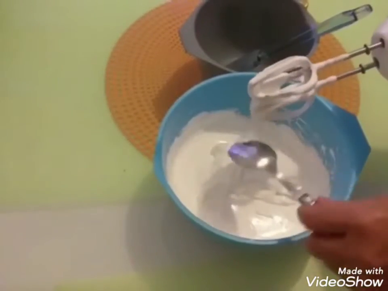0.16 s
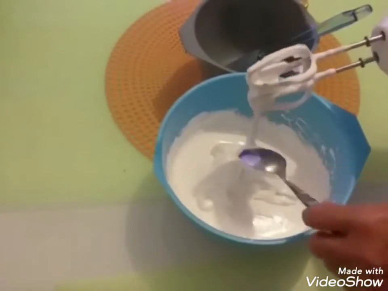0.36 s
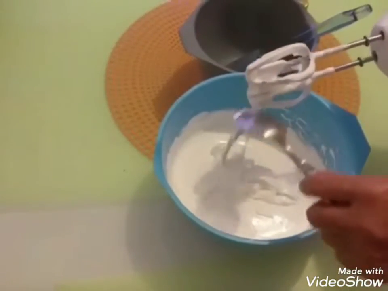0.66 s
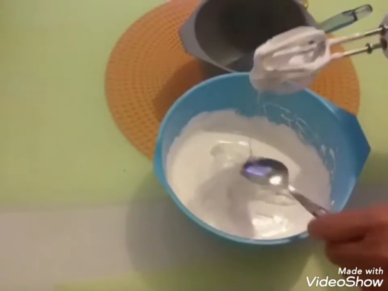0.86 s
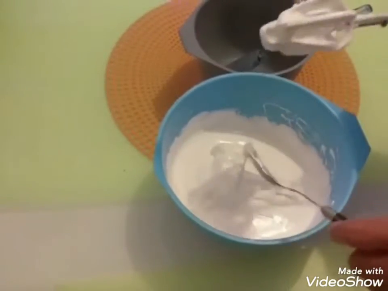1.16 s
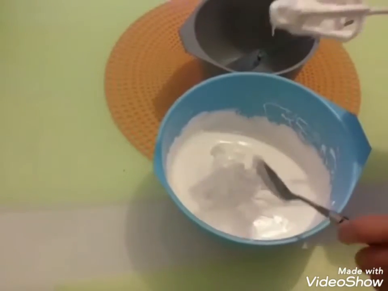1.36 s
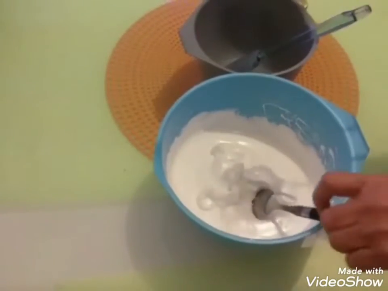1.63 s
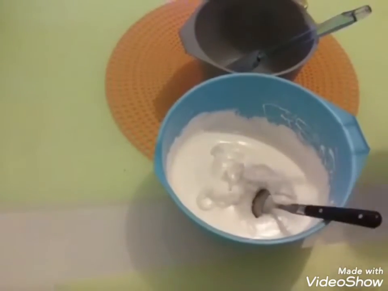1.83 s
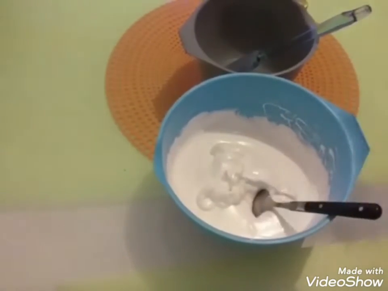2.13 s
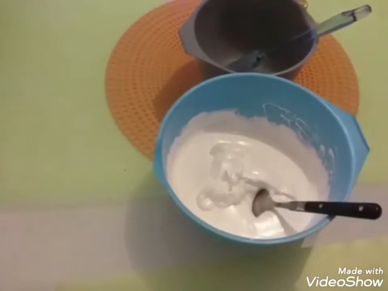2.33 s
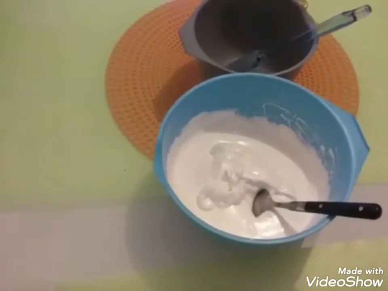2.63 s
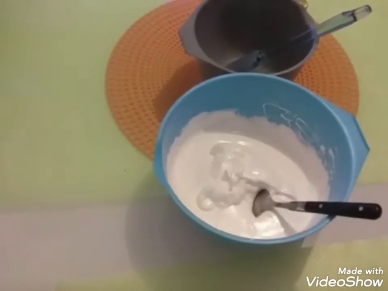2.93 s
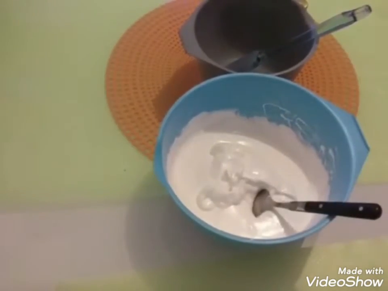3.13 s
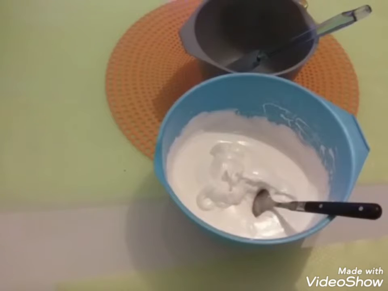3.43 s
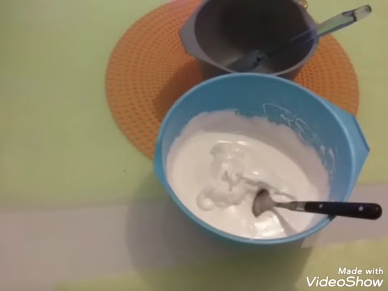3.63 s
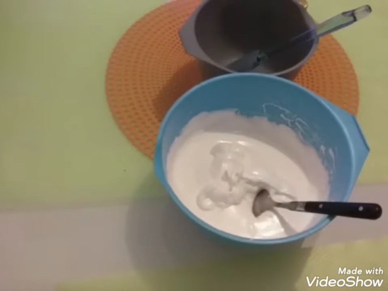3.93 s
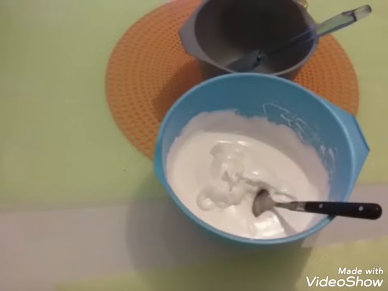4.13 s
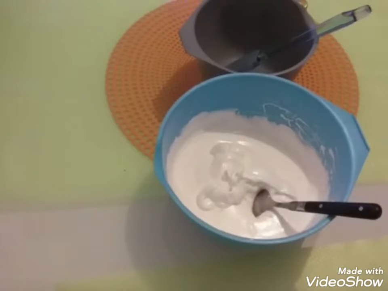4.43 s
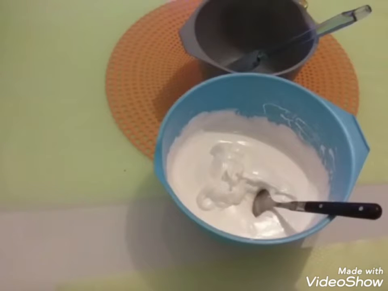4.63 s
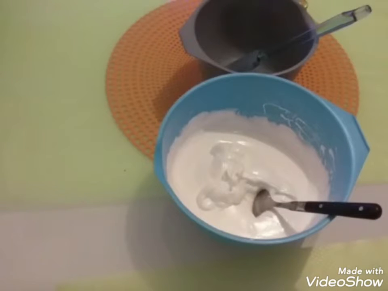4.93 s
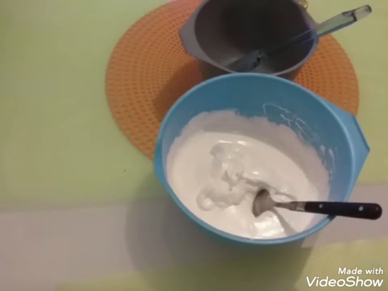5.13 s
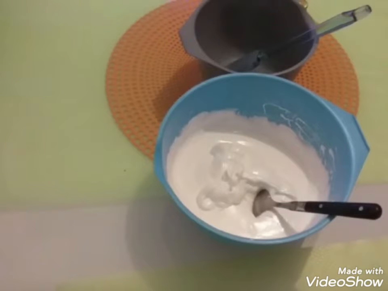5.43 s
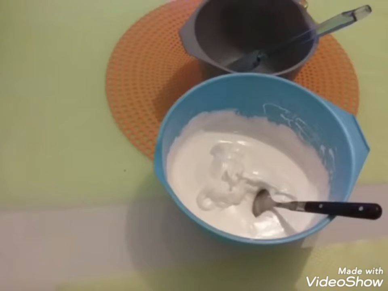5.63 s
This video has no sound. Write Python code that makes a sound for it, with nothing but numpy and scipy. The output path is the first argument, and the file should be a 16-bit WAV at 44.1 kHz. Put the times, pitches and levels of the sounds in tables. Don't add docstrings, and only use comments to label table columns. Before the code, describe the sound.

A metal spoon raps creamy mixer beaters and drops on a plastic bowl, then kitchen clatter, a ringing pan and a drawer slamming loudly.

```python
import sys
import numpy as np
from scipy import signal
from scipy.fft import rfft, irfft, next_fast_len
from scipy.io import wavfile
from scipy.ndimage import uniform_filter1d

SR = 44100
rng = np.random.default_rng(int(sys.argv[2]) if len(sys.argv) > 2 else 0)


def waveform_to_disk(signal):
    frames = np.transpose(np.atleast_2d(signal))
    scaled = np.clip(frames, -1, 1) * 32767
    samples = np.round(scaled).astype(np.int16)
    wavfile.write(sys.argv[1], SR, samples)


def gain_from_decibels(decibels):
    exponent = np.asarray(decibels, float) / 20
    return 10 ** exponent


N = 254501
PAD = next_fast_len(N)
LEAD = 256

# lower edge f/Hz, upper edge f/Hz
BANDS_HZ = [(90, 700), (700, 2500), (2500, 8300), (8300, 16400)]
WIDTHS_HZ = np.diff(BANDS_HZ)[:, 0]

# f/Hz, width/Hz, level/dB
STAND = [(1247, 50, -8), (2173, 36, -3), (2670, 110, -12), (3156, 74, -1.5), (4010, 39, 1.5),
         (4540, 18, -9), (4600, 30, -3), (5040, 62, 3), (5500, 31, -12), (6200, 79, -2), (6500, 25, -7),
         (6970, 37, -12), (7800, 27, -15), (7800, 46, -14)]
PAN = [(1162, 32, -3), (2130, 39, 1.5), (3210, 58, -3), (3260, 18, -6.5), (3630, 26, -0.5), (4060, 19, 2),
       (4230, 27, 0.5), (4400, 28, 0.5), (4980, 27, 1.5), (5300, 24, -8), (5500, 34, -5.5),
       (6450, 34, -1.5), (7160, 43, -4), (7900, 26, 0)]
LID = [(1386, 51, -4.5), (2030, 20, -20), (2660, 180, -5.5), (3800, 110, -5.5), (4700, 36, 1)]
# f/Hz, width/Hz, level/dB
BOWL = [(143, 40, -17.5), (285, 100, -0.5), (464, 48, 2), (780, 30, 1), (1020, 15, 4.5), (1196, 50, 14.5),
        (1440, 76, 10), (1940, 31, 13.5)]
HANDLE = [(269, 30, -5.5), (507, 30, 3), (1560, 60, -3)]
RUNNER = [(235, 40, -14), (394, 40, 1.5), (493, 40, 2.5), (675, 40, -6), (731, 40, -5.5)]
FRONT = [(129, 33, -18), (506, 190, -6.5), (759, 39, 1.5), (1044, 27, -4.5), (1265, 15, -4),
         (1414, 35, 5.5), (1570, 41, 1), (2086, 83, 13.5), (2200, 18, -14), (2583, 120, 12.5),
         (2950, 38, -13), (3250, 53, -23), (3910, 180, -11)]
CARCASS = [(117, 22, -13.5), (339, 33, -5), (780, 34, -3.5), (1102, 94, 4.5), (1446, 170, 7), (1930, 51, 3),
           (2160, 41, 2), (3820, 32, -13), (3920, 190, 9), (4530, 170, 3)]
# f/Hz, width/Hz, level/dB
WIRE_TIP = [(650, 290, -11), (1750, 130, -8), (3340, 100, 1.5), (4550, 110, -7), (5300, 120, -1.5),
            (6600, 100, -9), (8400, 110, -23.5), (10100, 140, -21), (13300, 120, -8.5), (13700, 130, -11)]
WIRE_SCRAPED = [(614, 29, -6), (3700, 50, 4.5), (4750, 73, 8), (5950, 98, -10), (6900, 44, -8),
                (7300, 78, -3.5), (7840, 66, -2.5), (8120, 30, -8), (9820, 180, -14), (13300, 170, -13.5)]
WIRE_BEND = [(596, 97, -5), (1870, 82, 5), (3110, 290, 3.5), (4800, 160, -15), (5550, 110, -7.5),
             (6600, 80, -12), (7220, 160, 1), (9620, 75, -17), (10800, 110, -26.5), (13100, 130, -15.5)]
WIRE_SIDE = [(1140, 22, 1), (2940, 110, -2), (3600, 38, -9.5), (3870, 23, -2.5), (4620, 15, -7.5),
             (5700, 46, -6), (6840, 52, -0.5), (7900, 30, -7.5), (9420, 78, 0), (13100, 63, -6)]
WIRE_ROOT = [(480, 35, -9), (1330, 28, 3), (2320, 46, -8.5), (3260, 21, -2), (4620, 58, -4.5),
             (5890, 40, -5), (7500, 35, 4), (11700, 100, -17), (13200, 130, -16.5), (13900, 44, -15.5)]
# f/Hz, level/dB, t60/s
MIXER_SHELL = [(420, -8.5, 0.33), (520, -3.5, 0.13), (2290, 5.5, .08), (7900, 14.5, 0.013),
               (7860, 19.5, .02)]
FLOOR_BOARD = [(175, 0, .25), (228, -2, .25)]
PAN_WALL = [(737, -10, 0.52), (1163, -9, 0.27), (1410, -3, 0.47), (1800, -12, .4), (1910, -7, .38),
            (2090, -10, 0.22)]
DRAWER_PANEL = [(117.8, -13, 0.32), (355, -5, 0.28), (493, -6, 0.25), (778, 4.5, .22), (1083, 0.5, 0.51),
                (1250, -9, 0.32), (1390, -14, 0.34), (1600, -6, .2), (1701, -9, .35), (1880, -3, 0.23),
                (2022, -10, 0.45), (2143, -15, 0.26), (2500, 2, .13)]
DRAWER_BOX = [(118, -4, .4), (345, 0, .4), (417, -6, .3), (735, -6, .3), (1080, -6, .3)]


def unit(x):
    return x / np.sqrt(np.mean(x ** 2))


def band(x, lo_hz, hi_hz):
    return signal.sosfilt(signal.butter(3, [lo_hz, hi_hz], "band", fs=SR, output="sos"), x)


def grains(count, spike_db):
    return unit(rng.standard_normal(count) * gain_from_decibels(spike_db * np.minimum(rng.exponential(size=count), 4)))


def band_noises(count, spike_db=0.):
    noise = grains(count, spike_db)
    return np.array([unit(band(noise, *edge)) for edge in BANDS_HZ])


def add(out, x, s):
    i = max(int(s * SR), 0)
    out[i:i + len(x)] += x[:len(out) - i]


def curve(rows):
    return np.interp(np.arange(N) / SR, *np.transpose(rows))


def walk(rate):
    k = int(SR / rate)
    held = np.repeat(rng.standard_normal(N // k + 1), k)
    return unit(uniform_filter1d(held, k)[:N])


def damped(peaks, cycles):
    return [(hz, db, cycles / hz) for hz, width, db in peaks]


def ring(modes, longest_s, scatter_db, rise_s):
    hz, db, t60 = np.transpose(modes)[:, :, None]
    chance = rng.standard_normal((2, len(modes), 1))
    t60 = np.minimum(t60, longest_s)
    t = np.arange(int(SR * t60.max())) / SR
    level_db = db + scatter_db * chance[0] - 60 * t / t60
    lines = gain_from_decibels(level_db) * np.sin(2 * np.pi * hz * t + chance[1])
    return lines.sum(axis=0) * (1 - np.exp(-t / rise_s))


def burst(envelope, band_db, spike_db):
    # f/Hz, the first an anchor below the bands
    centres_hz = [110, 370, 1400, 4500, 11500]
    envelope = np.roll(envelope, LEAD)
    x = grains(len(envelope), spike_db) * envelope
    spectrum = rfft(x)
    even = irfft(spectrum / (np.abs(spectrum) + 1e-12) ** .75, len(x))
    x = even * (envelope / envelope.max()) ** .3
    density = np.array(band_db) - 10 * np.log10(2 * WIDTHS_HZ / SR)
    grid = np.log(np.fft.rfftfreq(len(x), 1 / SR) + 1)
    shape = np.interp(grid, np.log(centres_hz), [density[0] - 30, *density])
    return irfft(rfft(x) * gain_from_decibels(shape), len(x))[:len(x) // 2] / np.sqrt(np.sum(x ** 2))


def steady(x):
    return unit(x / (np.abs(signal.hilbert(x, PAD)[:N]) + 0.23) ** 0.53)


def floor():
    # f/Hz, density/dB
    hum = [(30, -6), (95, -8.5), (420, -16), (640, -33), (1050, -18), (1900, -34), (7630, -31), (8400, -45)]
    # f/Hz, width/Hz, level/dB
    drones = [(86, 19, -2), (139.7, 25, -2), (223.4, 20, -13)]
    # t/s, level/dB
    load = [(0.0, -60.5), (0.6, -65), (1.9, -59), (2.6, -58), (2.85, -62.5), (3.3, -71), (4.2, -58.5),
            (4.9, -67.5), (5.77, -62)]
    hz, db = np.transpose(hum)
    grid = np.fft.rfftfreq(PAD, 1 / SR) + 1
    colour = gain_from_decibels(np.interp(np.log(grid), np.log(hz), db))
    tone = unit(irfft(rfft(rng.standard_normal(PAD)) * colour, PAD)[:N])
    drone = sum(gain_from_decibels(d + 2 * walk(10.0)) * unit(band(rng.standard_normal(N), f - w / 2, f + w / 2))
                for f, w, d in drones)
    hiss_db = curve([(3.3, -74), (3.66, -61.5)]) + 1.9 * walk(3.3)
    hiss = unit(band(rng.standard_normal(N), *BANDS_HZ[-1]))
    return gain_from_decibels(-65.5) * tone + gain_from_decibels(curve(load) - 5.0) * drone + gain_from_decibels(hiss_db + 1.0) * hiss


def kitchen(x):
    # t60/s, level/dB
    room = [(0.46, -2), (0.5, -1), (0.49, -2), (0.44, -4.5)]
    t = np.arange(SR) / SR
    tail = sum(gain_from_decibels(db - 60 * t / t60) * noise * np.sqrt(2 * width / SR)
               for (t60, db), noise, width in zip(room, band_noises(SR), WIDTHS_HZ))
    return signal.fftconvolve(x, tail * (1 - np.exp(-t / 0.00033)))[:N]


def panels():
    # t/s, level/dB, swell/s, modes
    struck = [
        (0.5289, -37, .0008, MIXER_SHELL),
        (2.12, -55, .01, FLOOR_BOARD),
        (2.3, -58, .01, FLOOR_BOARD),
        (2.45, -31.5, .004, PAN_WALL),
        (3.49, -55, .015, FLOOR_BOARD),
        (4.0, -56, .02, FLOOR_BOARD),
        (4.34, -47, 0.009, FLOOR_BOARD),
        (5.04, -17, 0.008, DRAWER_PANEL),
        (5.476, -36, .008, DRAWER_BOX),
    ]
    out = np.zeros(N)
    for s, db, swell_s, modes in struck:
        add(out, gain_from_decibels(db) * ring(modes, longest_s=.42, scatter_db=0, rise_s=swell_s), s)
    return out


def rail():
    # start t/s, length/s, level/dB
    fits = [(4.401, 0.017, -28), (4.525, 0.045, -32), (4.62, 0.04, -31), (4.707, .02, -32),
            (4.766, 0.037, -32.5), (4.854, 0.03, -33), (4.962, .03, -72), (5.22, 0.04, -36),
            (5.28, 0.04, -39.5), (5.35, .03, -54)]
    # f/Hz, width/Hz, level/dB, share of the fits
    upper = [(5645, 27, -0.5, 1.76), (8950, 46, -16, 1.7), (9570, 79, -17, 1.9), (10780, 150, -7.5, 1.76),
             (14400, 79, -25, 0.91)]
    # t/s, level/dB
    low_load = [(4.3, -120), (4.42, -48), (4.5, -75), (4.54, -46.5), (4.67, -53), (4.76, -58.5),
                (4.84, -59), (4.88, -61), (4.96, -67), (5.0, -84), (5.27, -56), (5.4, -120)]
    low_hz, low_width_hz = 2567, 42
    catch_db_per_s, fade_db_per_s = 1200, 420
    drive, t = rng.standard_normal(N), np.arange(N) / SR

    def mode(hz, width):
        return steady(unit(band(drive, hz - width, hz + width)))

    fit_levels = []
    for s, length, db in fits:
        slope_db = np.maximum(catch_db_per_s * (s - t), fade_db_per_s * (t - s - length))
        fit_levels.append(db - np.maximum(slope_db, 0))
    song_db = np.max(fit_levels, axis=0)
    high = sum(gain_from_decibels(db - 52.5 + share * (song_db + 39.5) + 0.7 * walk(45.0)) * mode(hz, width)
               for hz, width, db, share in upper)
    return high + gain_from_decibels(curve(low_load) + 1.5 * walk(25)) * mode(low_hz, low_width_hz)


def rubbing():
    # peak t/s, level/dB, build-up/s, low and top band re level/dB
    strokes = [(0.0, -38.5, .02, -14, -14.5), (0.899, -55.5, 0.11, -9, -29), (0.971, -62, 0.111, -9, -30),
               (1.687, -44, 0.022, 1, -34), (1.884, -45.5, 0.06, -12.5, -11), (2.03, -63, 0.48, 4.5, 1),
               (2.115, -50.5, 0.031, -2, 0), (2.22, -51.5, 0.39, -38, -2.5), (2.8, -56.5, 0.82, -13.5, -7),
               (2.98, -56.5, 0.063, -51, -14), (3.086, -52, 0.46, -48, -0.5),
               (3.182, -45.5, 0.16, -18, -4.5), (3.446, -80, 0.014, -9, -29),
               (3.549, -43.5, 0.024, -17.5, 0.5), (3.598, -35.5, 0.052, -35, -9.5),
               (3.65, -52.5, 0.018, -8, -29), (3.32, -61, .1, -25, 4), (3.745, -55.5, 0.074, -7, -13),
               (3.848, -53.5, 0.69, -26, -5.5), (3.94, -59, .1, -36, -2), (4.02, -54, 0.026, -39, 14),
               (4.359, -34.5, 0.011, -19, -7), (4.53, -43.5, 0.034, -7, -10), (4.63, -43.5, 0.3, -8, -8),
               (4.695, -29, 0.024, -13.5, -4), (4.738, -66, 0.067, -1, -15), (5.018, -52.5, 0.12, -1, -35)]
    build_db, ease_db_per_s = 19.5, 119
    t, gains = np.arange(N) / SR, np.zeros((len(BANDS_HZ), N))
    for s, db, build_s, low_db, top_db in strokes:
        drop_db = np.where(t < s, build_db * (s - t) / abs(build_s), ease_db_per_s * (t - s))
        band_db = np.array([low_db, 0.39 * low_db - 0.5, 0, top_db + 6.0])
        gains += gain_from_decibels(band_db)[:, None] * gain_from_decibels(db - drop_db)
    slips = sum(gain * gain_from_decibels(1.2 * walk(40)) * noise
                for gain, noise in zip(gains, band_noises(N, spike_db=2.5)))
    return band(slips, 170, 19000)


def jingles():
    # t/s, level/dB, stretch of the rattle
    shakes = [(1.115, -55.5, 0.93), (1.321, -52, 0.89), (1.947, -50, 0.91), (2.5484, -42, 0.74),
              (2.6646, -32.5, 1.48), (2.72, -39, 1.2), (3.909, -51, 1.3), (4.005, -34, 1.3),
              (4.019, -50, 1.2), (4.6893, -38, 0.77), (5.632, -37.5, 0.62), (5.6687, -35, 1.35)]
    # f/Hz, width/Hz, level/dB
    loose_parts = [(7900, 40, -34), (8600, 27, -15), (9700, 31, -18), (10400, 40, -10), (10960, 95, -2),
                   (11800, 32, -7.5), (12400, 27, -5), (12800, 33, -22), (14200, 31, -19), (14950, 58, -1),
                   (14770, 35, -15), (14500, 43, -1), (15200, 50, -2), (15400, 59, 2)]
    keys = [(3970, 31, -26), (5980, 22, -21), (6270, 23, -19), (8730, 26, -7), (9720, 28, -17),
            (10170, 25, -4), (11000, 34, -2), (12300, 27, -2), (12800, 26, -14), (13200, 29, -10),
            (14200, 37, -6), (14600, 24, 3), (15100, 24, -12), (15400, 30, 5)]
    clips = [(7640, 31, -25.5), (10400, 30, -13), (11000, 33, -8), (11800, 29, -9.5), (12600, 58, -16),
             (13200, 32, -18), (14200, 30, -10), (14400, 24, -13), (14540, 34, -9), (14900, 22, -8),
             (15000, 30, -6), (15300, 40, -3), (15400, 29, -5), (15600, 40, -9)]
    out = np.zeros(N)
    for s, db, stretch in shakes:
        metal = loose_parts if s < 3 else keys if s < 4.5 else clips
        modes = [(hz, mode_db, 4.2 / width) for hz, width, mode_db in metal]
        for late in np.array([0, .011, .025, .042]) * stretch:
            rattle = ring(modes, longest_s=0.11, scatter_db=6.5, rise_s=0.0017)
            add(out, gain_from_decibels(db - 0.5 - 153 * late) * rattle, s + late)
    return out


def pan():
    # f/Hz, level/dB, t60/s
    long_modes = [(220, -8, 0.3), (234, -8, .35), (3138, 5, 0.6), (3176, 3, 0.75), (3305, -3, 0.4),
                  (3381, 2, 0.3)]
    split_hz = 1.12
    out = np.zeros(N)
    add(out, gain_from_decibels(-36.0) * ring(long_modes, longest_s=1.57, scatter_db=-5.0, rise_s=0.0031), 2.45)
    pair = ring([(1950, 0, 1.2)], longest_s=3.0, scatter_db=0, rise_s=0.25)
    beat = np.sin(np.pi * np.minimum(split_hz * np.arange(len(pair)) / SR, 1)) ** 2
    add(out, gain_from_decibels(-37.0) * pair * beat, 2.47)
    add(out, gain_from_decibels(-51) * ring([(232.7, 0.0014, 0.73)], longest_s=1.7, scatter_db=-0.5, rise_s=0.0012), 0)
    return out


def blows():
    # t/s, peak level/dB, low, high and top band re peak/dB
    hits = [(1.052, -63.5, 4, 10, -36.5), (1.198, -68.5, 6, 8, -5), (1.422, -54, -31, -3, -34),
            (2.271, -34, -19.5, 9, -1), (2.443, -29.5, -26, 4, -11), (2.452, -23.5, -19, -2, -16),
            (3.068, -44.5, -9.5, -2, -17), (3.164, -42.5, -19, -8, -25), (3.447, -46.5, -11.5, -2, -37),
            (4.042, -38.5, 11, 7, 4), (4.07, -29.5, -2, 2, -20), (4.331, -42, 3, 7, -5),
            (4.353, -45.5, 17, 23.5, -7), (4.48, -30, -1, -5, -17), (4.724, -30, 12, 4.5, -29),
            (5.035, -7.5, -8, -10, -20), (5.044, -4.5, -10, -3.5, -27), (5.138, -16, -0.5, -8, -27),
            (5.471, -35, -2, 9, -13.5), (5.481, -25.5, -7, -17, -25)]
    # t/s, level/dB, cycles until dead, modes
    metal_rings = [
        (2.271, -46, 73, STAND),
        (2.451, -42, 58, PAN),
        (3.16, -52, 27.4, LID),
    ]
    # t/s, level/dB, cycles until dead, modes
    dull_thuds = [(1.6643, -50.5, 6.6, BOWL), (4.043, -45, 17, HANDLE), (4.07, -47, 20, HANDLE),
                  (4.352, -57.5, 15, RUNNER), (4.478, -45, 14, RUNNER), (4.505, -54, 21, RUNNER),
                  (4.64, -48, 17, RUNNER), (4.722, -37.5, 48, RUNNER), (4.772, -58, 41, RUNNER),
                  (5.042, -27.5, 15.3, FRONT), (5.142, -45.5, 53, FRONT), (5.142, -40, 24, RUNNER),
                  (5.479, -36, 15.6, CARCASS)]
    blow_s = .015
    out, t = np.zeros(N), np.arange(8192) / SR
    push = t ** 2 * np.exp(-5 * t / blow_s)
    for s, db, low_db, high_db, top_db in hits:
        hit = burst(push, [low_db, 0, high_db, top_db + 6.5], spike_db=3.5)
        add(out, gain_from_decibels(db - 5.5) * hit, s - .45 * blow_s - LEAD / SR)
    for s, db, cycles, modes in metal_rings:
        add(out, gain_from_decibels(db) * ring(damped(modes, cycles), longest_s=0.02, scatter_db=0.0, rise_s=0.00049), s - .003)
    for s, db, cycles, modes in dull_thuds:
        thud = ring(damped(modes, cycles), longest_s=0.048, scatter_db=1.5, rise_s=cycles / 5000)
        add(out, gain_from_decibels(db) * thud, s - .005)
    return out


def spoon():
    # t/s, peak level/dB, low, middle and top band re peak/dB
    knocks = [(0.092, -18.5, -15.5, -9, 0), (0.0974, -21.5, -32.5, -9, -23),
              (0.1477, -24.5, -33.5, 0.5, -5), (0.1522, -24, -24, -19.5, -4.5),
              (0.1559, -28.5, -19.5, -14, 5.5), (0.158, -31.5, -31, 0, -18.5), (0.1608, -30, -16, -2, -13),
              (0.2963, -24, -12, -12.5, -22.5), (0.3232, -26, -63.5, -0.5, -10),
              (0.503, -24, -49.5, -4.5, 3.5), (0.5305, -11, -25, -7, -9), (0.575, -30, -34, 1, -18.5),
              (1.052, -56.5, -29, 12, -32), (1.6582, -31.5, 6.5, 2.5, -17), (2.0977, -33.5, -48, 1, -20),
              (3.064, -35, -32, -26, -12)]
    # until t/s, ring re crack/dB, modes
    wires_met = [
        (.12, 0.5, WIRE_TIP),
        (.2, -5.5, WIRE_SCRAPED),
        (.4, -7.5, WIRE_BEND),
        (.52, -3.5, WIRE_SIDE),
        (1, -9, WIRE_ROOT),
    ]
    # f/Hz, level/dB, t60/s
    spoon_modes = [(1850, -1, 0.2), (1930, 0, 0.3), (1985, -1, .26), (2060, -2, .18)]
    contact_t60_s = 0.021
    rim_s, rim_hz, rim_db, rim_t60_s = 1.6588, 1183, -19, 0.023
    out, t = np.zeros(N), np.arange(8192) / SR
    decay = gain_from_decibels(-60 * t / contact_t60_s) * (1 - np.exp(-t / 0.00053))
    for s, db, low_db, mid_db, top_db in knocks:
        crack = burst(decay, [low_db, mid_db, 0, top_db + 4.0], spike_db=3.5) * np.sqrt(np.sum(decay ** 2))
        add(out, gain_from_decibels(db) * crack, s - LEAD / SR)
        if s < 1:
            ring_db, wires = next(row[1:] for row in wires_met if s < row[0])
            wire_ring = ring(damped(wires, 84.0), longest_s=0.02, scatter_db=4.0, rise_s=0.00072)
            add(out, gain_from_decibels(db + ring_db) * wire_ring, s)
    add(out, gain_from_decibels(-56) * ring(spoon_modes, longest_s=.6, scatter_db=0, rise_s=0.0026), .324)
    add(out, gain_from_decibels(rim_db - 60 * t / rim_t60_s) * np.sin(2 * np.pi * rim_hz * t), rim_s)
    return out


def scene():
    near, far, rub = spoon(), blows(), rubbing()
    tones = pan() + jingles() + rail()
    wet = kitchen(far + gain_from_decibels(-34.0) * near + gain_from_decibels(-36.0) * tones + gain_from_decibels(-51.0) * rub)
    mono = near + gain_from_decibels(17) * far + tones + gain_from_decibels(-6.0) * rub + wet + floor() + panels()
    return np.array([mono, mono])


def starved(x, quiet_db, share):
    hz, t, z = signal.stft(x, SR, nperseg=1024)
    row = ((hz - 8900) // 700).astype(int)
    chance = uniform_filter1d(rng.standard_normal((row.max() + 1, z.shape[1])), size=3)
    power = np.abs(z) ** 2
    total = power.sum(axis=0)
    busy = (total > gain_from_decibels(quiet_db) ** 2) & (t > 1.66)
    for k in range(len(chance)):
        here = power[row == k].sum(axis=0)
        weak = (here < gain_from_decibels(-16) ** 2 * total) & (here < .8 * uniform_filter1d(here, size=13))
        z[row == k] *= np.where(busy & weak & (chance[k] > share), .008, 1)
    return signal.istft(z, SR, nperseg=1024)[1][:len(x)]


def top_cut(x):
    return signal.sosfilt(signal.butter(12, 16870, fs=SR, output="sos"), x)


def record(dry):
    grid = np.fft.rfftfreq(PAD, 1 / SR)
    treble_db = -9 * np.clip((grid - 8100) / 500, 0, 1)
    treble_db += 2 * np.clip((grid - 11500) / 1500, 0, 1)
    treble_db -= 45 * np.clip((grid - 15800) / 250, 0, 1)
    response = np.clip(grid / 75, 0, 1) ** 2 * gain_from_decibels(treble_db)
    spectrum = rfft(np.tanh(0.36 * dry[0]) / 0.44, PAD) * response
    mid = starved(irfft(spectrum, PAD)[:N], quiet_db=-57.5, share=.25)
    side = np.roll(band(mid, 9960, 14000), 300) * walk(80) * gain_from_decibels(-9)
    return top_cut(np.array([mid + side, mid - side]))


dry = scene()
out = record(dry)
waveform_to_disk(out)
```